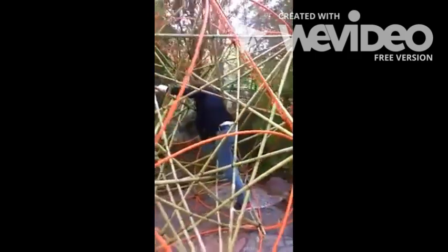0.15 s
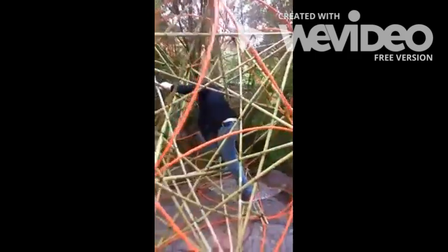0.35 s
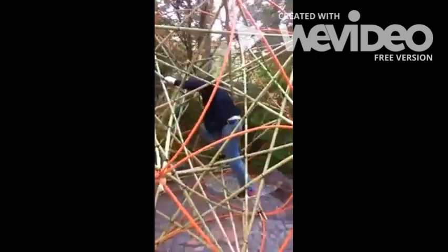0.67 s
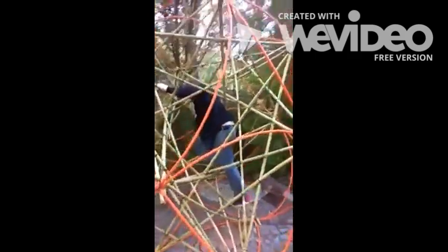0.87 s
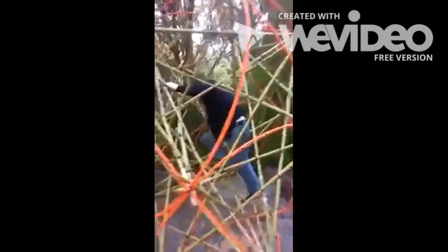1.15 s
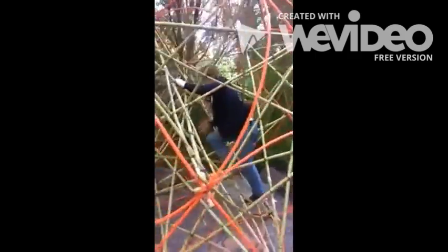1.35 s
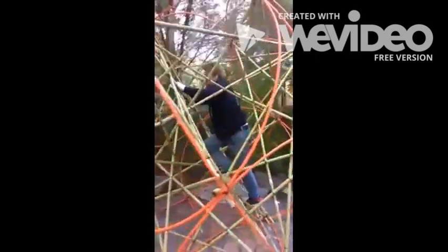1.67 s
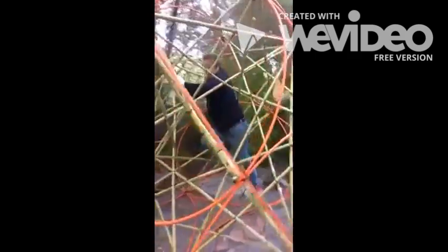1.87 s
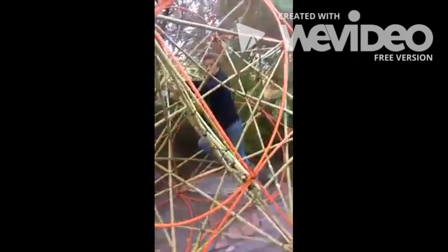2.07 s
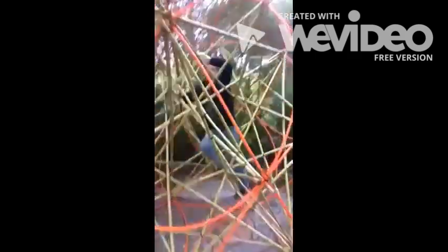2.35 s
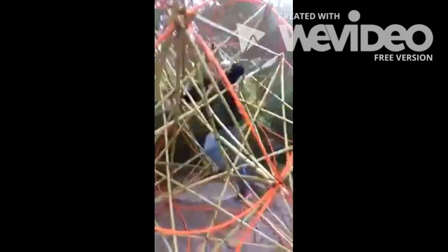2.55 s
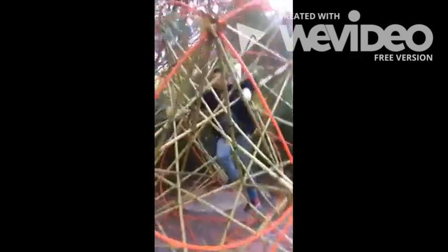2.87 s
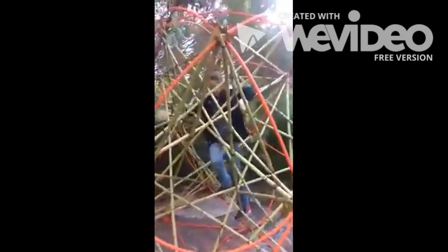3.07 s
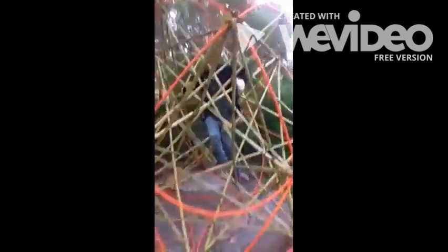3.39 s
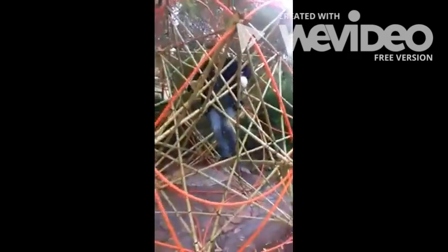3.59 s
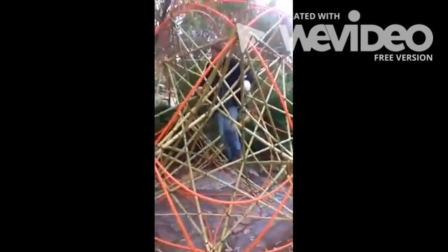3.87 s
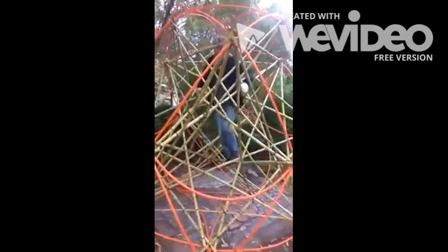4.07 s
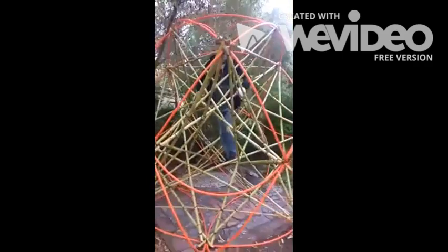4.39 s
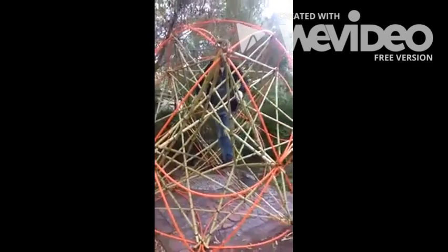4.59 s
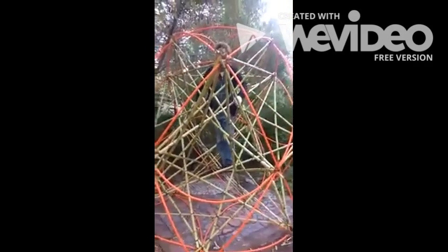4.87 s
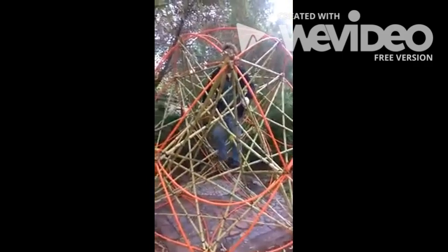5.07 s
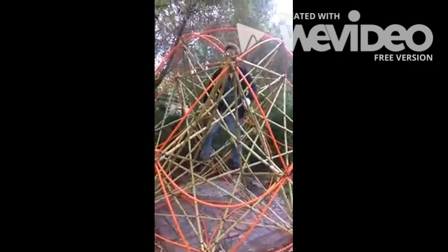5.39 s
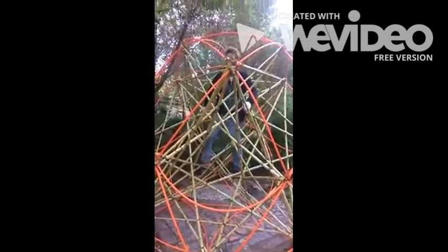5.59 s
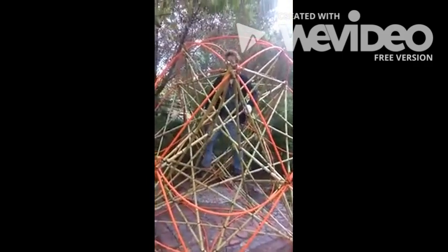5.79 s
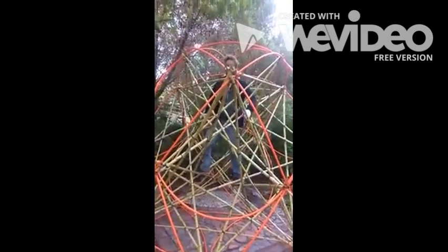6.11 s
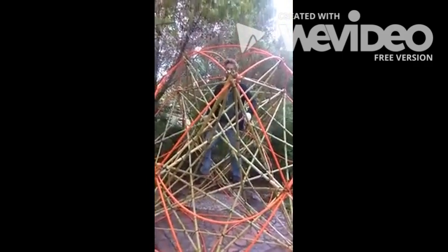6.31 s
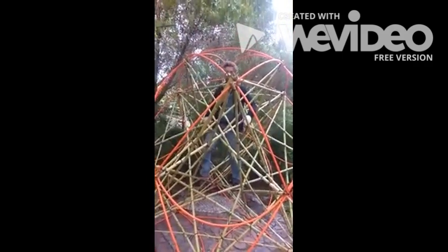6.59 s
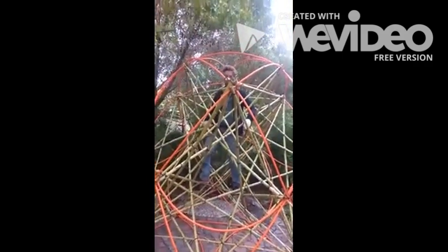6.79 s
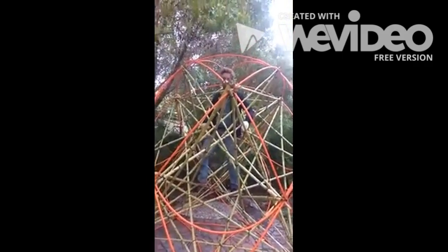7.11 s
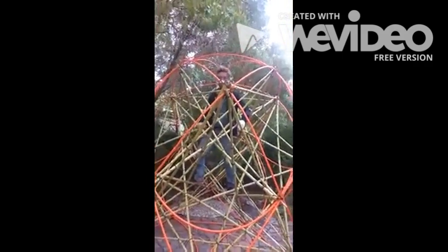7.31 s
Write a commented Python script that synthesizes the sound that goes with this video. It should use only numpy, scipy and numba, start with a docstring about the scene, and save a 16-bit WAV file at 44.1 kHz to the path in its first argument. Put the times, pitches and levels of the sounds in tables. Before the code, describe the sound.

Outdoors, a few metres away, someone climbs through a frame of lashed bamboo poles. The lashings creak and tick in tiny bursts, clothes brush faintly past, and two soft footfalls land early on. Light clacks give way to three sharp, hollow knocks, the last one loudest and followed by a brief rattle. A steady rush like distant traffic lies behind, dipping after each loud knock.

```python
"""Outdoors, a few metres from a frame of lashed bamboo poles, a phone hears someone climb through it.
Lashings creak in stick-slip bursts, clothes swish past, hollow poles knock, ring and chatter, and
feet thud. The frame and the trees scatter each crack. Behind it all lies an even rush like distant
traffic, which the phone's gain control ducks after every loud knock."""
import sys
import numpy as np
from scipy import signal
from scipy.fft import rfft, irfft
from scipy.io import wavfile
from scipy.ndimage import uniform_filter1d
from numba import njit

SR = 44100
rng = np.random.default_rng(int(sys.argv[2]) if len(sys.argv) > 2 else 0)


def pcm_store(signal):
    """Save signal as 16-bit PCM."""
    levels = np.round(np.clip(np.atleast_2d(signal), -1, 1) * 32767)
    wavfile.write(sys.argv[1], SR, levels.astype(np.int16).T)


N = 328390
TIME = np.arange(N) / SR
FREQ = np.maximum(np.fft.rfftfreq(N, 1 / SR), 1)
CROSSFEED_S, TOP_HZ = .00041, 15300

# stereo image of diffuse sound: frequency_hz, likeness (-1 to 1), left_minus_right_db
STEREO_FIELD = [(28, -0.29, -2), (60, 0.53, -0.5), (130, 0.79, -0.5), (350, 0.74, -4), (710, 0.97, -5),
                (1470, 0.99, -1), (2400, 0.91, -2.5), (3100, 0.78, -3), (4870, 1, 0), (8800, 0.76, -1.5),
                (10200, -0.2, -7), (15000, 0.52, -5.5)]
# tone curves of the background bed, each with: frequency_hz, level_db
RUSH_EQ = [(22, -19), (80, -6), (220, -7.5), (430, -5.5), (1000, -0.5), (1450, -4), (1780, -6.5),
           (2200, -13), (3200, -19.5), (4900, -31), (7200, -35.5), (10000, -45), (15000, -49.5)]
RUMBLE_EQ = [(22, -22), (45, -7), (82, 0.5), (110, 0.5), (148, -4), (170, 0), (198, -6), (290, -4.5),
             (500, -10.5), (1000, -15), (4000, -76)]
HISS_EQ = [(500, 8), (3000, 4), (6000, 0), (9000, 1.5), (15000, -6.5)]
# slow swell of the bed: time_s, level_db, upper_edge_db, relative_rumble_db, crest_hz, crest_db
RUSH_SWELL = [(0, -33.5, 0, -6.5, 1050, 1.5), (.55, -33.5, -1.5, -10, 1000, -2),
              (1.5, -33.5, -.5, -8.5, 820, 2.5), (2.3, -30.5, -2, -8, 1040, 0.5),
              (3.1, -32, -1, -9, 1000, 2), (3.45, -30.5, 1.5, -10, 1000, 0.5),
              (3.9, -30.5, 1.5, -9, 1080, -0.5), (4.5, -33, -.5, -9.5, 1060, 4),
              (5.1, -31.5, -2.5, -10, 1200, 2), (5.5, -30.5, -1.5, -11.5, 1000, 0),
              (5.9, -27.5, -5.5, -9.5, 900, -0.5), (6.45, -27.8, -4.5, -9, 890, -1),
              (7, -28, -2, -7.5, 950, 4), (7.45, -28, -6, -8.5, 850, 0)]
# tone curves of a hard contact, the echoes, cloth and a footfall: frequency_hz, level_db
CRACK_EQ = [(100, -36), (500, -4), (1000, -1.5), (1800, 6), (2700, 6.5), (3600, -0.5), (4600, 2.5),
            (6300, -8), (7600, -12), (10000, -20), (15000, -30)]
ECHO_EQ = [(200, -17), (1000, -7), (1800, -4), (2300, -8), (3000, -2), (3500, -1.5), (4500, -3.5),
           (5400, -1), (6600, 0), (8500, 1.5), (11000, 1), (15000, 2)]
CLOTH_EQ = [(500, -25), (2000, -25), (3500, 3), (6500, 0.5), (9000, -5), (15000, -13)]
THUD_EQ = [(25, -16), (55, 1), (90, -4), (150, -6), (400, -29), (1500, -60)]
# ring of the hollow poles: pitch_hz, level_db, t60_s
BAMBOO_MODES = [(1305, -15, .07), (2090, -5, .04), (2400, 1, .045), (2600, -4, .04), (2755, -3, .09),
                (2945, 0, .07), (3235, -8, .09), (3400, -10, .1), (3520, -5, .16), (3650, -12, .08),
                (3965, -11, .09), (4245, -18, .08), (5015, -10, .07), (5215, -11, .08), (5370, -11, .14),
                (5650, -19, .08), (6065, -17, .09), (6410, -9, .095), (6668, -7, .095), (7800, -20, .1),
                (8085, -18.5, .115), (9330, -23, .07)]
# short stick-slip bursts, mostly a lashing slipping; the row at 3.8135 s is a bright catch of cloth on a pole:
# start_s, level_db, length_s, tilt_db_per_octave, clack_hz
LASHING_SLIPS = [(0.122, -18.5, 0.0058, 6, 6400), (0.184, -25, 0.0052, 14, 6200),
                 (.2915, -27, .005, 12, 6500), (0.307, -15.5, 0.0059, 6, 6550),
                 (0.356, -11, 0.007, 9.5, 5060), (.566, -27, 0.0053, 8, 4260), (.671, -27, 0.0048, 5, 4100),
                 (0.867, -22.5, 0.0079, -3, 3900), (0.9547, -19.5, 0.021, 5.5, 4170),
                 (1.268, -16.5, 0.0099, 0, 3760), (1.308, -22.5, .003, 8, 6040),
                 (1.333, -25, 0.012, 8, 7000), (1.922, -23.5, .012, 6, 7000), (2.043, -24, .04, 6, 8300),
                 (2.891, -22.5, 0.0047, 2, 3550), (3.153, -23, 0.0033, 9, 3050),
                 (3.419, -19.5, 0.0052, 3, 3380), (3.8135, -22.5, 0.015, 13, 9220),
                 (3.833, -29, 0.0037, 10, 10500), (4.045, -22, .003, 7, 8150),
                 (4.419, -13.5, 0.0069, -3.5, 4180), (4.877, -7.5, 0.006, 11, 8600),
                 (4.8804, -9, .003, 3, 3580), (4.964, -16, 0.0054, 2, 3550), (5.516, -20, 0.0091, -3, 3400),
                 (5.732, 7.5, .02, 2.5, 3300)]
# clothes and shoes brush the poles: start_s, length_s, level_db
CLIMBER_MOVES = [(0.151, 0.2, -59), (0.298, .07, -56), (0.926, 0.28, -60), (1.286, 0.11, -57),
                 (1.898, 0.32, -58.5), (2.817, 0.11, -60), (3.8, 0.064, -57), (3.85, 0.36, -52),
                 (4.548, 0.27, -54.5), (5.41, 0.13, -58)]
# pole hits pole: start_s, level_db, tilt_db_per_octave, low_edge_hz, top_edge_hz,
# clack_hz, clack_boost_db, clack_width_octaves, relative_ring_db, echo_send_db
POLE_HITS = [(.3093, -16.5, 2, 2000, 7000, 4270, 20, .04, -40, -3),
             (0.3102, -20, -1, 1800, 7500, 4650, 18, .04, -40, -2),
             (0.3127, -17.5, -7, 500, 7000, 1110, 13, .1, -42, 4),
             (.326, -21, -21, 300, 4000, 880, 10, .12, -44, 5),
             (0.3585, -11.5, 7.5, 3200, 9000, 6500, 13, .1, -41, -9),
             (.3582, -15.5, 3, 3200, 9000, 3665, 20.5, 0.037, -42, -8),
             (0.3622, -10, 8.5, 3500, 10000, 6900, 17, .1, -41, -9),
             (.3622, -15, 3, 3200, 9000, 3750, 15, 0.033, -42, -8),
             (0.3617, -13, -9.5, 500, 5000, 1140, 13, .09, -42, 2),
             (1.071, -22, -10.5, 400, 9000, 1900, 17, 0.22, -40, 6),
             (2.473, -16, -12.5, 400, 9000, 2080, 14, 0.21, -41, -2),
             (3.1795, -2, 0, 2200, 13000, 3380, 14, .15, -36, -4),
             (3.1806, -10, 1.5, 2000, 8000, 2570, 14, .07, -34, -4),
             (3.1815, -12, 4, 2500, 12000, 6750, 18, .1, -32, 5),
             (4.8269, 7, 1.5, 700, 5050, 3550, 7.5, 0.11, -48, -3),
             (4.8273, -14, 11, 8000, 12000, 9800, 6, .15, -45, -5),
             (4.8272, -9, -3, 700, 2400, 1750, 8, .12, -45, -5),
             (5.7314, -4.5, -0.5, 400, 12000, 1390, 6, 0.15, -23, 1),
             (5.7368, -1.5, -4, 500, 12000, 6600, 13, .05, -10.5, -5),
             (5.741, -2, -2, 500, 12000, 2320, 12, .07, -22, -2),
             (5.7443, 1.5, 3.5, 1200, 12000, 3480, 7, .12, -21, 3)]
# the climber's weight lands: start_s, length_s, level_db
FOOTFALLS = [(1.592, 0.072, -38.5), (1.878, 0.14, -37)]
# neighbouring poles chatter after a hard blow: start_s, length_s, level_db
POLE_RATTLES = [(3.2, .05, -17), (5.747, 0.029, -10), (5.775, .085, -15)]


def undb(db):
    """Decibels to gain."""
    return 10 ** (np.asarray(db) / 20)


def along(points, hz, axis=1):
    """Read one column of a curve on a log-frequency axis."""
    table = np.array(points, float)
    return np.interp(np.log(hz), np.log(table[:, 0]), table[:, axis])


def fade(t, t60):
    """Exponential decay, 60 dB down after t60."""
    return np.exp(-np.log(1000) * t / max(t60, 1e-3))


def add(track, s, sound):
    """Mix a sound into a track at time s."""
    start = max(int(s * SR), 0)
    part = sound[..., :N - start]
    track[..., start:start + part.shape[-1]] += part


def diffuse(eq):
    """Stereo noise of rms 1; the phone's cross-feed puts its treble in and out of phase by turns."""
    notches = np.abs(np.cos(np.pi * FREQ * CROSSFEED_S)) ** 3.46
    comb = np.where(FREQ * CROSSFEED_S < .5, 1, 1 - 2 * notches)
    likeness = np.clip(along(STEREO_FIELD, FREQ) * comb, -.99, .99)
    mid, side = rfft(rng.standard_normal((2, N)))
    signs = np.array([[1], [-1]])
    pair = mid * np.sqrt(1 + likeness) + signs * side * np.sqrt(1 - likeness)
    pan_db = signs * along(STEREO_FIELD, FREQ, axis=2) / 2
    noise = irfft(pair * undb(along(eq, FREQ) + pan_db), N)
    return noise / noise.std()


def wander(rate_hz):
    """Smooth random modulation with a spread of 1."""
    hold = int(SR / rate_hz)
    steps = np.repeat(rng.standard_normal(N // hold + 1), hold)
    smooth = uniform_filter1d(uniform_filter1d(steps, hold), hold)[:N]
    return smooth / smooth.std()


@njit
def swept_bandpass(x, hz, width_hz):
    """State-variable band-pass with a moving centre and gain 1 there."""
    y, band_state, low_state = np.empty(len(x)), 0., 0.
    for i in range(len(x)):
        g, damping = np.tan(np.pi * hz[i] / SR), width_hz / hz[i]
        band = (band_state + g * (x[i] - low_state)) / (1 + g * (g + damping))
        band_state = 2 * band - band_state
        low_state += 2 * g * band
        y[i] = damping * band
    return y


def distant_rush(waver_db=.5, hiss_db=-59, edge_hz=2050, edge_octaves=.39, crest_width_hz=380.):
    """The bed: a far-off rush and rumble swell under thin hiss; the crest drifts, the edge dulls."""
    when, *controls = np.transpose(RUSH_SWELL)
    swell_db, edge_db, rumble_db, crest_hz, crest_db = (np.interp(TIME, when, c) for c in controls)
    body = diffuse(RUSH_EQ)
    edge_band = np.exp(-(np.log2(FREQ / edge_hz) / edge_octaves) ** 2)
    edge = irfft(rfft(body) * edge_band, N)
    crest = np.array([swept_bandpass(channel, crest_hz, crest_width_hz) for channel in body])
    body = body + edge * (undb(edge_db) - 1) + crest * (undb(crest_db) - 1)
    body *= undb(swell_db + waver_db * wander(9))
    rumble = diffuse(RUMBLE_EQ) * undb(swell_db + rumble_db + wander(12))
    return body + rumble + undb(hiss_db) * diffuse(HISS_EQ)


def crack(tilt, clack_hz, clack_db, octaves=.15, low_hz=700, top_hz=14000, size=2048):
    """One hard contact, peak 1, tilted in dB per octave; the cane wall adds a brief pitched clack."""
    hz = np.maximum(np.fft.rfftfreq(size, 1 / SR), 1)
    db = along(CRACK_EQ, hz) + tilt * np.log2(np.maximum(hz, 500) / 3000)
    db += clack_db / (1 + (np.log2(hz / clack_hz) / octaves) ** 2)
    db -= 10 * np.log10((1 + (low_hz / hz) ** 6) * (1 + (hz / top_hz) ** 6))
    # minimum phase packs the energy into the attack
    cepstrum = irfft(np.log(undb(db)))
    cepstrum[1:size // 2] *= 2
    cepstrum[size // 2 + 1:] = 0
    click = irfft(np.exp(rfft(cepstrum)))
    return click / np.abs(click).max()


def pole_ring(detune=.00047, uneven_db=3.5, grip_t60_s=1.0, size=12000):
    """The pole's modes, damped by its lashings; each contact drives them a little differently."""
    t, out = TIME[:size], 0
    for hz, db, t60 in BAMBOO_MODES:
        pitch, push, phase = rng.standard_normal(3)
        tone = np.sin(2 * np.pi * (hz * (1 + detune * pitch) * t + phase))
        out = out + undb(db + uneven_db * push) * fade(t, t60) * tone
    return out * fade(t, grip_t60_s)


def lashing_creaks(slips_hz=900, clack_db=6, ring_db=-35):
    """A lashing lets go in a short run of uneven stick-slip clicks, and the pole rings faintly."""
    out = np.zeros(N)
    for s, db, length, tilt, clack_hz in LASHING_SLIPS:
        count = 2 + int(length * slips_hz)
        jitter, strength = rng.random((40, 2))[:count].T
        when = (np.arange(count) + jitter) / count
        sizes = (.24 + strength) * np.exp(-.6 * when)
        click = undb(db) * crack(tilt, clack_hz, clack_db) / np.linalg.norm(sizes)
        for part, size in zip(when, sizes):
            add(out, s + part * length, size * click)
        add(out, s, undb(db + ring_db) * pole_ring())
    return out


def echoes(send, near_db=-7, near_t60_s=.054, far_db=-.5, far_t60_s=.32, size=26000):
    """Quick reflections off the nearby poles, then a longer wash from trees and ground."""
    t = TIME[:size]
    near = fade(t, near_t60_s) * (1 - fade(t, .0094))
    far = fade(t, far_t60_s) * (1 - fade(t, .0033))
    envelope = np.hypot(undb(near_db) * near / np.linalg.norm(near),
                        undb(far_db) * far / np.linalg.norm(far))
    tail = diffuse(ECHO_EQ)[:, :size] * envelope
    return signal.fftconvolve(send[None], tail, axes=1)[:, :N]


def cloth_brushes(grain_db=2.0, catch_db=5):
    """Cloth slides over the poles in short grainy swishes, catching on the fibres as it goes."""
    envelope = np.zeros(N)
    for s, length, db in CLIMBER_MOVES:
        add(envelope, s, undb(db) * signal.windows.tukey(int(length * SR) + 2, .6))
    catches = undb(catch_db * wander(700))
    catches /= np.sqrt(np.mean(catches ** 2))
    return diffuse(CLOTH_EQ) * envelope * undb(grain_db * wander(150)) * catches


def lashing_ticks(over_cloth_db=19, spread_db=4, count=6):
    """Each move loads the frame: lashings tick faintly at random, louder for a stronger move."""
    out = np.zeros(N)
    click = crack(tilt=12, clack_hz=6000, clack_db=3)
    for s, length, db in CLIMBER_MOVES:
        for when, strength in rng.random((count, 2)):
            tick_db = db + over_cloth_db + spread_db * (2 * strength - 1.5)
            add(out, s + when * length, undb(tick_db) * click)
    return out


def pole_knocks():
    """Pole strikes pole: a sharp crack with a hollow ring. Returns the hits and their echo send."""
    out, send = np.zeros(N), np.zeros(N)
    for s, db, tilt, low_hz, top_hz, clack_hz, clack_db, octaves, ring_db, echo_db in POLE_HITS:
        blow = undb(db + ring_db) * pole_ring()
        add(blow, 0, undb(db) * crack(tilt, clack_hz, clack_db, octaves, low_hz, top_hz))
        add(out, s, blow)
        add(send, s, undb(echo_db) * blow)
    return out, send


def foot_thuds():
    """Each shift of weight onto a foot sends a short, low thud through the ground."""
    envelope = np.zeros(N)
    for s, length, db in FOOTFALLS:
        add(envelope, s, undb(db) * signal.windows.hann(int(length * SR) + 2))
    return diffuse(THUD_EQ) * envelope


def pole_rattles(centre_hz=3600, scatter_octaves=.3, uneven_db=3, fall_db=14, count=12):
    """A hard blow shakes the neighbouring poles: they chatter, each at its own pitch, and settle."""
    out = np.zeros(N)
    for s, length, db in POLE_RATTLES:
        when = (np.arange(count) + rng.random(count)) / count
        for part, (pitch, push) in zip(when, rng.standard_normal((count, 2))):
            hz = centre_hz * 2 ** (scatter_octaves * pitch)
            click = crack(tilt=3, clack_hz=hz, clack_db=10, octaves=.052, low_hz=2400)
            add(out, s + part * length, undb(db - fall_db * part + uneven_db * push) * click)
    return out


def direct(x, cross=.83, leak=.15):
    """Sound straight from the frame: cross-feed gives the right side mostly a late, inverted copy."""
    late = np.roll(x, round(CROSSFEED_S * SR))
    return np.array([x, leak * x - cross * late])


def scene(creak_send_db=-2, tick_send_db=-6):
    """The mix: bamboo and its echoes up front, with cloth and feet, over the distant bed."""
    knocks, knock_send = pole_knocks()
    creaks, rattles, ticks = lashing_creaks(), pole_rattles(), lashing_ticks()
    bamboo = direct(knocks + creaks + rattles + ticks)
    send = knock_send + undb(creak_send_db) * creaks + rattles + undb(tick_send_db) * ticks
    return bamboo + echoes(send) + cloth_brushes() + foot_thuds() + distant_rush()


def gain_control(x, threshold_db=-26, share=.78, attack_s=.019, recovery_db_per_s=10.0):
    """Loud peaks duck the whole mix quickly; the gain then climbs steadily back."""
    power = uniform_filter1d(np.mean(x ** 2, axis=0), size=180)
    level_db = 10 * np.log10(np.maximum(power, 1e-12))
    wanted_db = share * np.maximum(level_db - threshold_db, 0)
    release_db = recovery_db_per_s * TIME
    cut_db = np.maximum.accumulate(wanted_db + release_db) - release_db
    lag = np.exp(-1 / (attack_s * SR))
    return x * undb(-signal.lfilter([1 - lag], [1, -lag], cut_db))


def record(dry):
    """The phone rides its gain, clips the sharpest crack and cuts the top."""
    clipped = np.clip(gain_control(dry), -.95, .95)
    lowpass = signal.ellip(10, .1, 90, TOP_HZ, fs=SR, output="sos")
    return signal.sosfilt(lowpass, clipped)


dry = scene()
out = record(dry)
pcm_store(out)
```